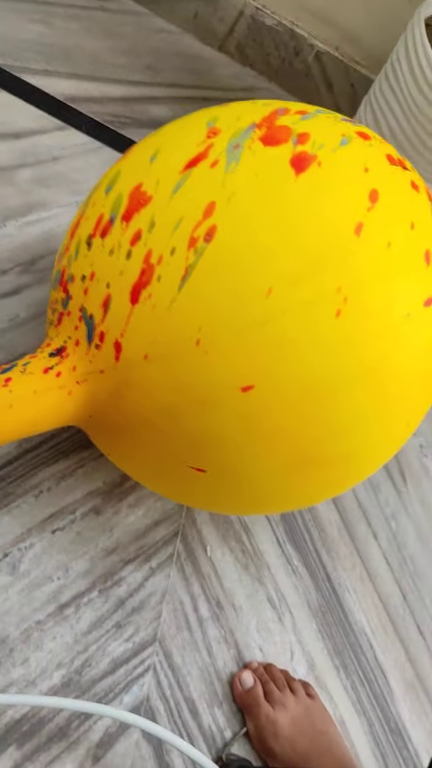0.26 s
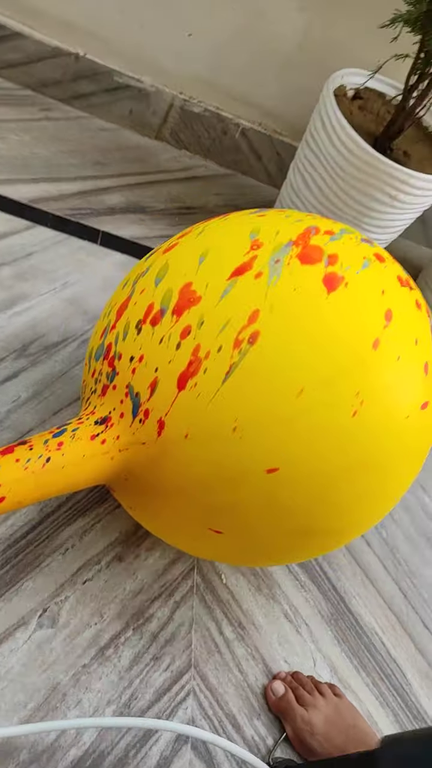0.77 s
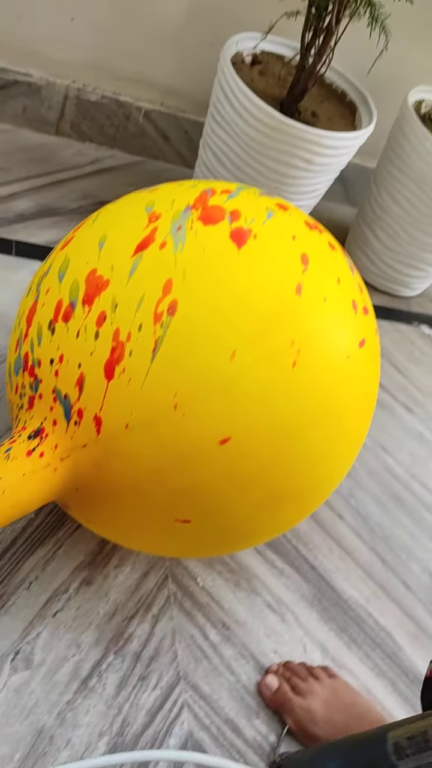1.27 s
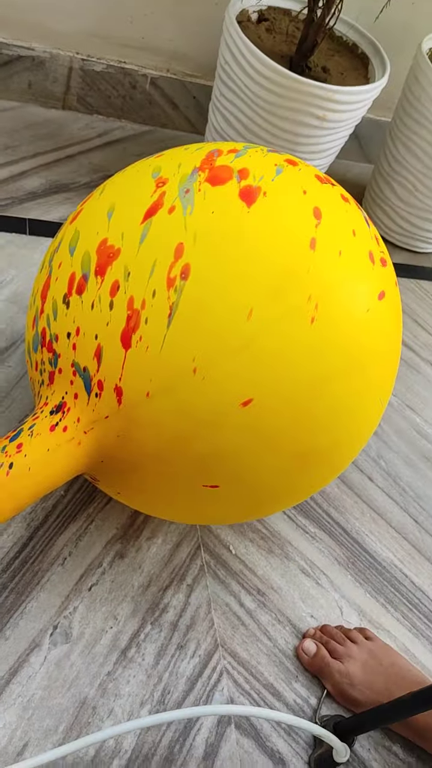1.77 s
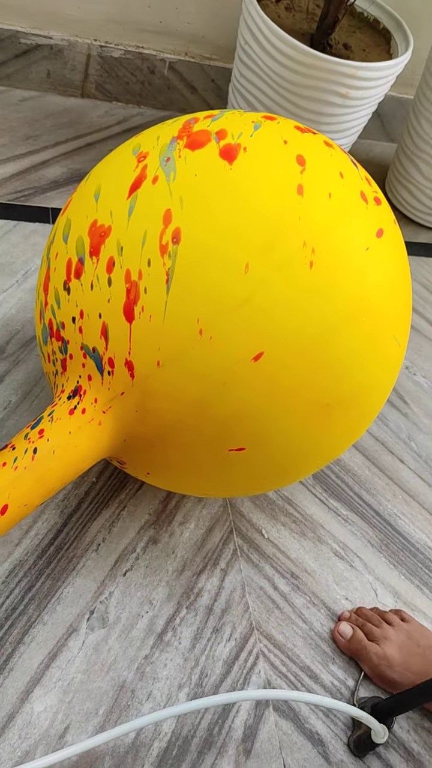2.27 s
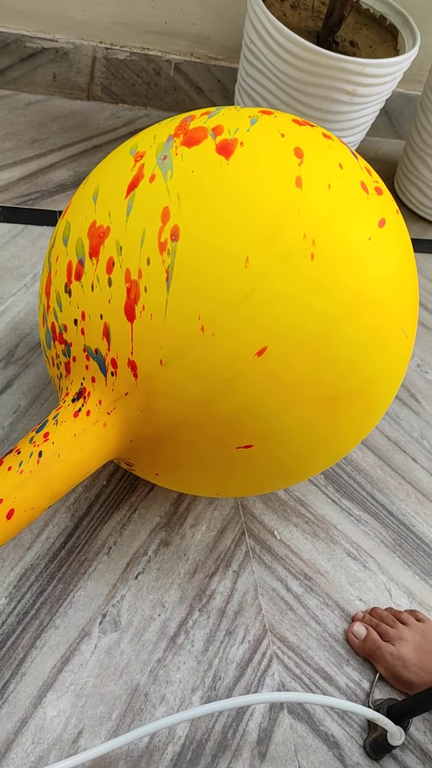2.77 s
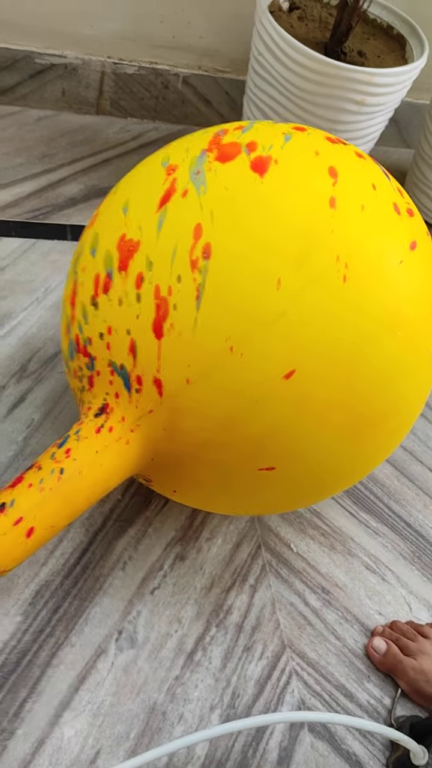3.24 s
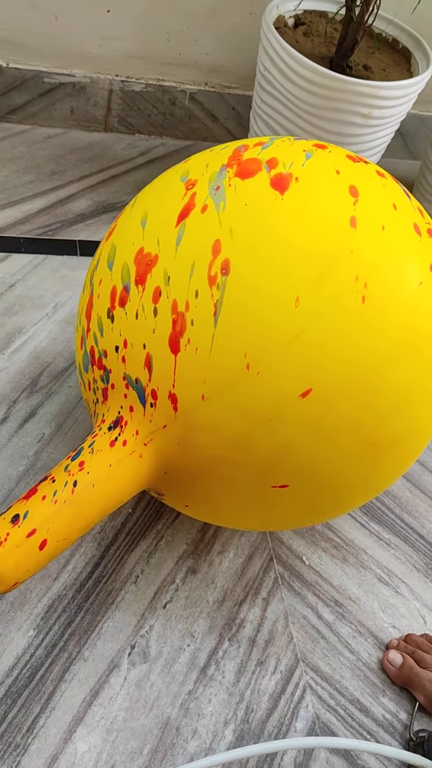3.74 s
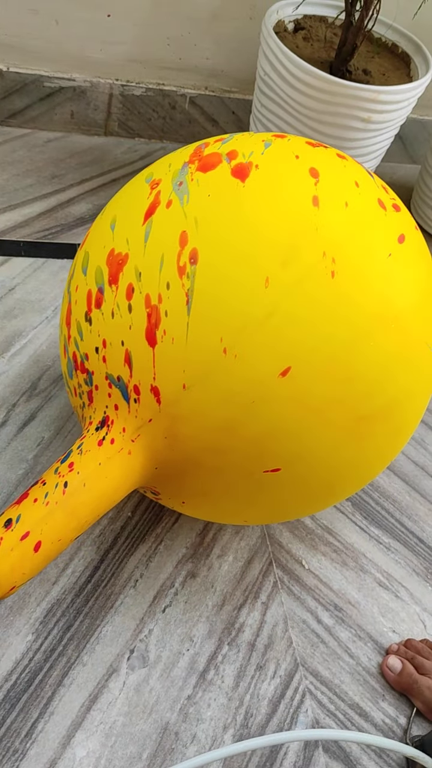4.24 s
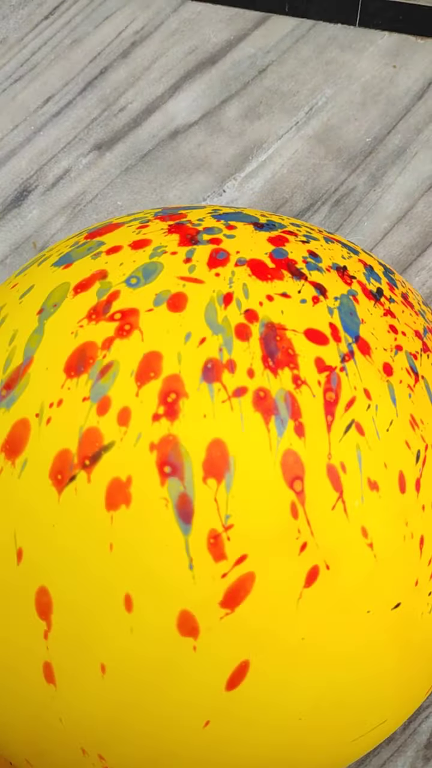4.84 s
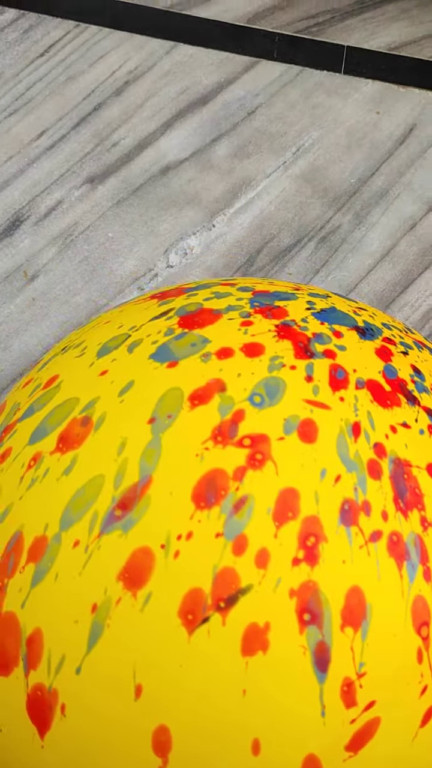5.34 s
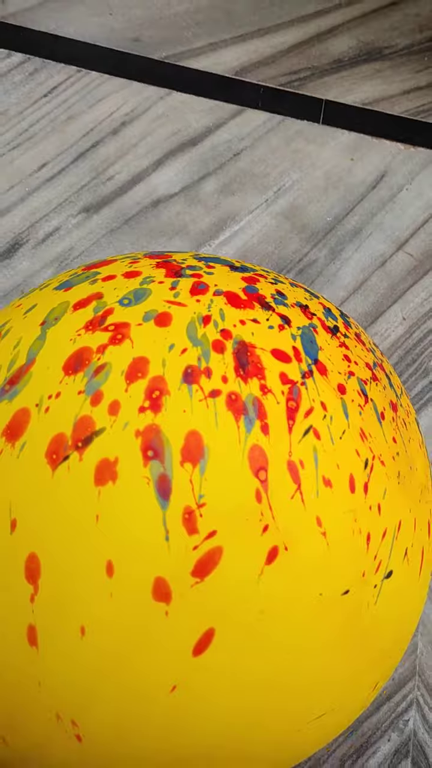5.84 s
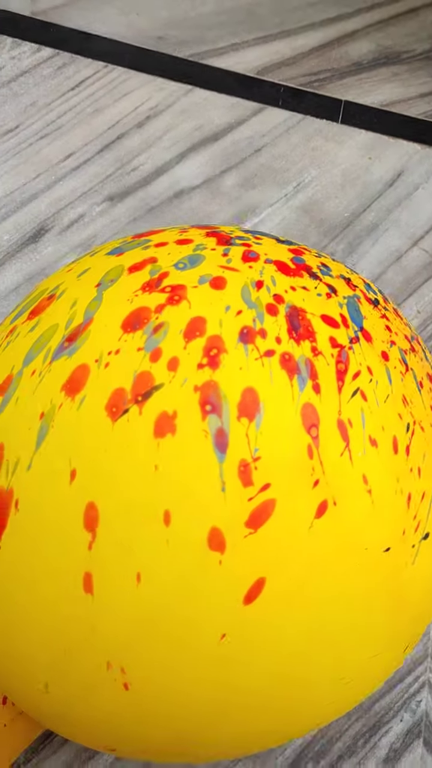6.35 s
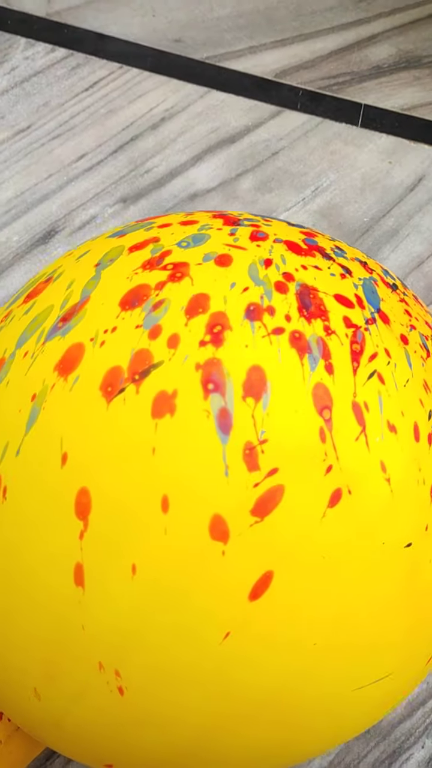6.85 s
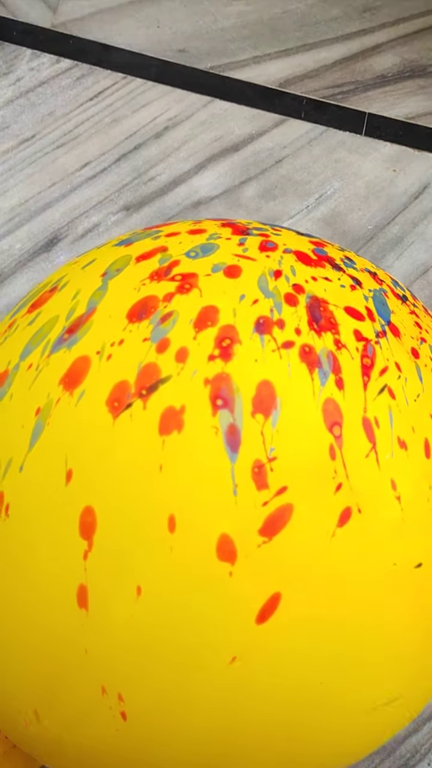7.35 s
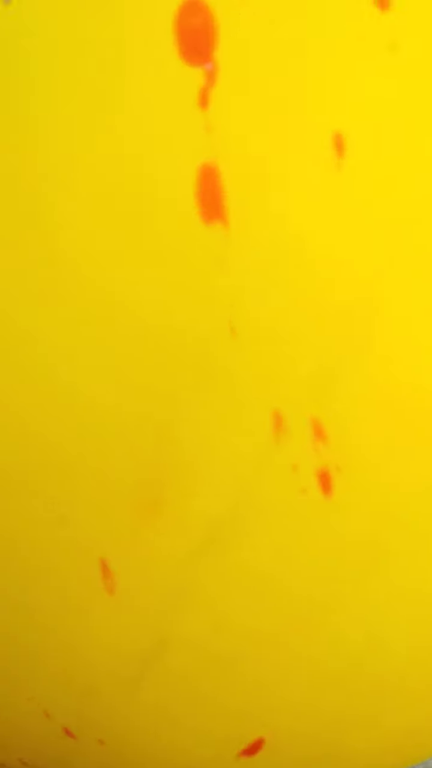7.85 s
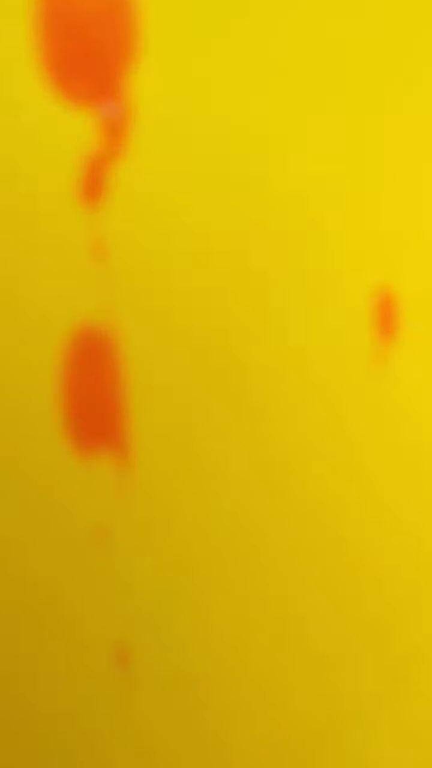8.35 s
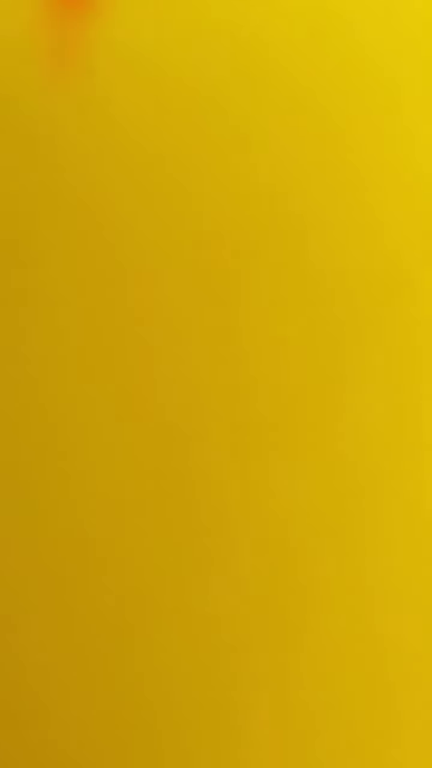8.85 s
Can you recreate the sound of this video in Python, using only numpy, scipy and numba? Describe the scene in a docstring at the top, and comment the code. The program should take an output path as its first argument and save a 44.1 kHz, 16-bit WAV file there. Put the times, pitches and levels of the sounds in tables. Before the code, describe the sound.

In a small, hard tiled room, a hand air pump fills a large balloon. Strong rasping pushes through a resonant hose alternate with softer, sucking pulls that slide upward with brief whistles. Ringing knocks, ticks and dull thuds punctuate the strokes, while low air buffets a close hand-held stereo microphone. At about seven and a half seconds everything cuts out, leaving faint hiss, hum and a late light tap.

```python
"""A hand pump fills a large balloon in a tiled room, heard through the two ports of a hand-held phone.
From the start, pushes (a noise jet through hose resonances) alternate with softer pulls (hiss in a shrinking
air column, with gliding whistles). Many pushes end in a ringing knock; short damped rings tick and thud between.
Low noise buffets the ports. At 4.6 s the jet changes colour as the phone moves over the balloon. Near 7.5 s
all sound drops out, returns for an instant, and leaves hiss, a fuller hum and one last light tap."""
import sys
import numpy as np
from scipy import signal
from scipy.fft import rfft, irfft, next_fast_len
from scipy.io import wavfile
from scipy.ndimage import uniform_filter1d, map_coordinates
from numba import njit

SR = 44100
rng = np.random.default_rng(int(sys.argv[2]) if len(sys.argv) > 2 else 0)


def store_pcm(level_fs):
    """Save levels as 16-bit WAV."""
    pcm = np.round(np.clip(level_fs, -1, 1) * 32767).astype(np.int16)
    wavfile.write(sys.argv[1], SR, np.atleast_2d(pcm).T)


N = 401751
SIZE = next_fast_len(N)  # FFT length in samples

# Source levels are set ahead of flutter and room.
# Pushes of the piston: start_s, ease_off_s, full_hiss_db, fade_s
PUSH_STROKES = [(-.3, -0.061, -30, 0.06), (0.328, 0.545, -31.5, 0.07), (0.992, 1.251, -30.5, 0.047),
                (1.725, 1.941, -29.5, 0.051), (2.316, 2.537, -27.5, 0.047), (2.89, 3.1, -27.5, 0.059),
                (3.49, 3.665, -27.5, 0.077), (4.107, 4.358, -28.5, 0.094), (4.831, 4.956, -26.5, 0.071),
                (5.408, 5.565, -26, 0.067), (6.039, 6.296, -27, 0.052), (6.699, 6.923, -27, 0.051),
                (7.33, 7.69, -27.5, 0.051)]
PUSH_GAP_DB, PUSH_RISE_S = 29, 0.053  # shortfall at start_s, and the time constant that closes it
# Colour of the jet: freq_hz, slope points as gain_db
JET_COLOUR = [(240, -14.5), (400, -11), (636, -10), (738, -13), (883, -1.5), (1510, -9.5), (2590, -7),
              (4400, -4.5), (6430, -1.5), (14200, -23.5)]
# Standing waves of the hose: freq_hz, width_hz, beside_balloon_db, above_balloon_db
HOSE_MODES = [(964, 97, 9, -4.5), (1120, 85, 6.5, 4), (1384, 55, 8, 9), (1645, 94, 11, 12),
              (1906, 117, 10.5, 12.5), (2374, 89, 10.5, 5.5), (2637, 65, 11, 9.5), (2845, 74, 3.5, 5.5),
              (2934, 74, 9, 3.5), (3140, 80, 5.5, 7.5), (3280, 47, 8.5, 2), (3560, 117, 10, 5.5),
              (3760, 69, 4.5, -14), (3973, 97, 6, 7), (4246, 120, 3.5, 1.5), (5200, 35, -9.5, 1),
              (5850, 20, -8, 2)]
# Brighter, leaner jet beside the balloon: freq_hz, gain_db
BESIDE_COLOUR = [(900, -3.5), (4000, 2.5)]
ABOVE_S = 4.6  # the phone is moved over the balloon
HOSE_SWAY, HOSE_SWAY_HZ = 0.007, 4  # typical pitch drift as a share, new drifts per second

# Pulls of the piston: start_s, end_s, peak_hiss_db
PULL_STROKES = [(0.026, 0.308, -37), (0.675, 0.949, -35.5), (1.312, 1.662, -39), (1.978, 2.279, -35.5),
                (2.561, 2.852, -36), (3.171, 3.453, -38), (3.791, 4.046, -37), (4.523, 4.758, -42.5),
                (5.079, 5.351, -41), (5.675, 5.991, -35.5), (6.365, 6.664, -37.5), (6.971, 7.286, -42.5)]
PULL_LATE, PULL_PEAKED = 1.3, 1.05  # exponents: hand fastest after mid-stroke, hiss against its speed
# Colour of the drawn air: freq_hz, gain_db
INTAKE_COLOUR = [(240, -10), (400, -7.5), (800, -6.5), (1280, -6), (2370, -2.5), (2750, -1), (3340, -3),
                 (5070, -9.5), (7140, -2), (10900, -12.5), (14200, -23.5)]
COLUMN_START_HZ, COLUMN_END_HZ = 253.9, 1283.6  # nominal mode spacing, before and after a pull
COLUMN_ECHO = 0.93  # share returned per round, ahead of the treble and bass loss
# Modes of the shrinking column that sing out: start_s, length_s, from_hz, to_hz, peak_db
WHISTLE_GLIDES = [(0.143, 0.073, 2730, 4100, -38), (0.174, 0.02, 2005, 2260, -29.5),
                  (.755, 0.045, 1840, 2060, -40), (0.865, 0.027, 2100, 2580, -35),
                  (1.409, 0.024, 2920, 3200, -39), (1.42, .03, 1880, 2060, -41),
                  (1.435, 0.047, 1460, 1750, -40.5), (1.572, 0.019, 1980, 2150, -35),
                  (1.585, 0.023, 2400, 2610, -42), (2.159, 0.029, 2100, 2530, -36.5),
                  (2.197, 0.024, 1910, 2450, -39), (2.767, 0.068, 1384, 2520, -42),
                  (3.266, 0.06, 1460, 1950, -42.5), (3.378, 0.039, 2030, 2670, -43),
                  (3.917, 0.048, 2250, 2840, -37), (3.965, 0.1, 930, 1330, -49.5),
                  (3.988, 0.079, 1750, 2300, -48.5), (4.641, 0.059, 1500, 1834, -43),
                  (4.665, 0.052, 2400, 2590, -41), (7.13, 0.097, 760, 1107, -47)]
WHISTLE_BREATHY_DB = 7  # typical unsteadiness

# Piston hits its stop: start_s, low_modes_db, bright_modes_db (clack too), pitch_factor
STOP_KNOCKS = [(0.601, -16, -29, 0.77), (1.254, -11.5, -14.5, 0.76), (3.109, -17, -18, 0.76),
               (3.697, -17, -20, 0.97), (4.406, -15, -13.5, 0.99), (5.012, -23, -23.5, 0.91),
               (5.601, -17.5, -20, 0.94), (7.694, -19.5, -17, 0.89)]
# Modes of the barrel, ahead of each knock's factor and levels: freq_hz, level_db, t60_s
BARREL_MODES = [(196, -15, 0.059), (388, -10, 0.051), (504, -2, 0.026), (1025, -13.5, 0.015),
                (1283, -14.5, 0.063), (1558, -1.5, 0.017), (2153, -0.5, 0.0097), (2630, -6, .03)]
# Short soft tones as a valve or the hose flips: start_s, level_db, pitch_hz
FLIP_PIPS = [(0.308, -36.5, 486), (0.966, -28, 551), (1.701, -30, 530), (2.897, -26.5, 544),
             (3.471, -27, 525), (6.539, -26, 863), (6.698, -28, 530), (7.336, -40, 417)]
# Duller thuds as the pressure opens the neck: start_s, level_db, pitch_hz
NECK_THUDS = [(0.44, -29.5, 259), (1.815, -25, 270), (2.417, -27.5, 254), (2.598, -41, 395),
              (2.99, -30, 243), (3.566, -21, 261), (4.726, -38, 272), (4.797, -30.5, 285),
              (5.406, -31, 293), (5.456, -30, 260), (5.808, -36, 258), (5.828, -38, 300),
              (6.158, -22.5, 252), (6.509, -36, 285), (6.544, -32.5, 297), (6.809, -34, 246),
              (7.411, -40, 258)]
# Rod rattles on or just after a pull: start_s, level_db, pitch_hz
ROD_TICKS = [(1.495, -17, 1870), (2.12, -29, 890), (2.145, -33, 1420), (2.216, -28, 820), (2.302, -22, 815),
             (2.742, -19.5, 1600), (3.345, -25, 1440), (4.804, -37, 870), (4.838, -30.5, 895),
             (5.26, -31.5, 860), (5.405, -29.5, 970), (6.003, -32, 620), (6.54, -19.5, 1600),
             (7.298, -37, 480), (7.321, -28, 450)]
TAP_S, TAP_DB = 9.0585, -29.5  # last light tap on something hard nearby
# Modes of the tapped object, relative to the tap level: freq_hz, level_db, t60_s
TAP_MODES = [(380, -4.5, 0.091), (666, 2, 0.037), (1050, -5, 0.058), (1880, -1, 0.028), (2680, -5, .02),
             (3710, 0, 0.022), (5400, -23, .03)]

# Strength of the draught on the ports, ahead of its split and scaling: time_s, level_db
DRAUGHT_LEVEL = [(0, -25), (.14, -24), (.25, -44), (.32, -41), (.36, -25), (.61, -36), (1.19, -31.5),
                 (1.45, -46.5), (1.72, -34), (1.97, -39.5), (2.05, -28), (2.18, -38.5), (2.76, -30),
                 (2.87, -26), (2.93, -35.5), (3.14, -35), (3.46, -41), (3.52, -29.5), (3.94, -36),
                 (4.3, -49), (5.6, -45.5), (6.3, -53), (7.53, -50)]
DRAUGHT_EVEN_DB, DRAUGHT_LEAN = -45, 1.14  # leans left above this level, right below; dB per dB
# Colour of the buffets: freq_hz, gain_db
BUFFET_COLOUR = [(12, -66), (20, -25), (54, 3.5), (103, 1), (165, -3), (231, -9.5), (340, -12.5),
                 (478, -24.5), (780, -30), (1320, -120)]
# Single gusts that thump one port: centre_s, level_db, port (0 left, 1 right)
PORT_GUSTS = [(0.109, -14, 0), (0.127, -16, 0), (0.387, -15, 0), (0.442, -12.5, 0), (0.515, -18.5, 0),
              (0.631, -19, 1), (0.798, -20.5, 0), (1.714, -26, 0), (2.015, -12.5, 0), (2.302, -14, 0),
              (2.695, -9, 0), (2.795, -17.5, 0), (2.841, -13.5, 0), (2.897, -12.5, 0), (3.007, -11, 0),
              (3.276, -15, 0), (3.555, -11, 0), (3.885, -17.5, 0), (4.915, -25, 1)]

# Colour of the quiet room's hiss: freq_hz, gain_db
ROOM_COLOUR = [(12, -59), (20, -22.5), (54, 1.5), (77, -8.5), (107, -22), (157, -17.5), (207, -20.5),
               (411, -24.5), (526, -24), (740, -28), (1270, -31), (2600, -32), (5580, -29.5),
               (14200, -54.5)]
ROOM_HISS_DB = -47  # rms ahead of wander and balance
# Hum and faint whines at their fuller level, ahead of wander and balance: freq_hz, peak_db
HUM_TONES = [(49, -49.5), (102, -57), (205, -65), (545, -72), (1087, -74), (1631, -72.5), (2169, -70)]

ROOM_T60_S, ROOM_MOVES = 0.19, 44  # reverb time, crossfades between tails over the scene
ALIKE_HZ = 724  # below this the tails at both ports become alike
# Difference in colour between the ports: freq_hz, left_minus_right_db
PORT_COLOUR = [(500, -0.5), (1000, -1), (2000, 2.5), (4000, 1.5), (6500, -4.5), (7500, -0.5), (9000, 5.5),
               (14000, -1.5)]
SILENT_S, RETURN_S, LAST_S = 7.538, 7.678, 7.712  # dropout, return, end of pumping
TOP_HZ = 14270  # upper edge of what is heard


def hose_jet(modes_column, lean):
    """Turbulent jet noise lifted at the hose's standing waves, rms 1."""
    freq = np.fft.rfftfreq(SIZE, 1 / SR)
    lift = 0.54  # power that passes between the modes
    for row in HOSE_MODES:
        hz, width_hz = row[:2]
        lift = lift + undb(row[modes_column]) ** 2 / (1 + ((freq - hz) / (width_hz / 2)) ** 2)
    return noise(gain_of(JET_COLOUR) * lean * np.sqrt(lift))[0]


def pushes():
    """Each push drives the hose jet; flexing of the hose bends the pitch of its modes."""
    t = np.arange(N) / SR
    drift = np.arange(N) + np.cumsum(HOSE_SWAY * walk(HOSE_SWAY_HZ))
    beside = map_coordinates(hose_jet(2, gain_of(BESIDE_COLOUR)), [drift], mode="mirror")
    above = map_coordinates(hose_jet(3, 1), [drift], mode="mirror")
    pressure = np.zeros(N)
    for start, ease, db, fade in PUSH_STROKES:
        gap_db = PUSH_GAP_DB * np.exp(np.minimum((start - t) / PUSH_RISE_S, 2))
        release = np.exp(-(np.maximum(t - ease, 0) / fade) ** 2)
        pressure += undb(db - gap_db) * release * (t > start - 2 * PUSH_RISE_S)
    return pressure * np.where(t < ABOVE_S, beside, above)


def pulls():
    """Intake hiss resonates in the air column above the piston, whose modes glide up as it shrinks."""
    t = np.arange(N) / SR
    draw, travel = np.zeros(N), np.zeros(N)  # travel is 1 with the handle fully out
    for start, end, db in PULL_STROKES:
        way = np.clip((t - start) / (end - start), 0, 1)
        draw += undb(db) * np.abs(np.sin(np.pi * way ** PULL_LATE)) ** PULL_PEAKED
        travel = np.where(t >= start, way, travel)
    long_lag, short_lag = SR / COLUMN_START_HZ, SR / COLUMN_END_HZ
    lag = long_lag + travel * (short_lag - long_lag)
    hiss = level(column(noise(gain_of(INTAKE_COLOUR))[0], lag, COLUMN_ECHO, soft=0.81, leak=0.08), 0)
    return draw * hiss * undb(3.5 * walk(30))


@njit
def column(x, lag, echo, soft, leak):
    """Sound running to and fro in a tube of changing length; each round loses treble and leaks bass."""
    y, low, bass = np.zeros(len(x)), 0., 0.
    for i in range(400, len(x)):
        past = i - lag[i]
        k = int(past)
        returned = y[k] + (past - k) * (y[k + 1] - y[k])  # between two samples
        low += soft * (returned - low)
        bass += leak * (low - bass)
        y[i] = x[i] + echo * (low - bass)
    return y


def seal_flutter():
    """Rapid random gain as the piston's seal flutters, making the air rasp."""
    return undb(2.56 * walk(60))


def whistles():
    """Single column modes sing out as short unsteady tones that glide up around the pulls."""
    out = np.zeros(N)
    for s, length, from_hz, to_hz, db in WHISTLE_GLIDES:
        way = np.linspace(0, 1, int(length * SR))
        phase = 2 * np.pi * np.cumsum(from_hz * (to_hz / from_hz) ** way) / SR
        add(out, s, undb(db) * np.sin(np.pi * way) * np.sin(phase))
    return out * undb(WHISTLE_BREATHY_DB * walk(90))


def knocks():
    """The piston's stop clacks as a noise burst and rings the damped modes of the barrel."""
    out = np.zeros(N)
    for s, low_db, bright_db, pitch in STOP_KNOCKS:
        for hz, mode_db, t60 in BARREL_MODES:
            strike_db = low_db if hz < 800 else bright_db
            add(out, s, undb(mode_db + strike_db) * ring(hz * pitch, t60, 0.0012))
        add(out, s, undb(bright_db + 6.0) * crack(670, 3300, 0.0062))
    return out


def valves_and_rod():
    """Pips and thuds are single damped rings; rod ticks add a dry crack to theirs."""
    out = np.zeros(N)
    for s, db, hz in FLIP_PIPS:
        add(out, s, undb(db) * ring(hz, 0.06, 0.0025))
    for s, db, hz in NECK_THUDS:
        add(out, s, undb(db) * ring(hz, 0.082, 0.0037))
    for s, db, hz in ROD_TICKS:
        rattle = crack(0.28 * hz, 2.2 * hz, 0.0058) + 0.5 * ring(hz, 0.029, 0.0004)
        add(out, s, undb(db) * rattle)
    return out


def last_tap():
    """A light contact cracks and rings the modes of something hard."""
    out = np.zeros(N)
    tap = 2.9 * crack(280, 2800, 0.0056)
    for hz, db, t60 in TAP_MODES:
        tap += undb(db) * ring(hz, t60, 0.0003)
    add(out, TAP_S, undb(TAP_DB) * tap)
    return out


def draught():
    """Moving air buffets each port with unrelated low noise, in lumps, with a few hard gusts."""
    db = curve(*np.transpose(DRAUGHT_LEVEL))
    left = 1 / (1 + undb(-DRAUGHT_LEAN * (db - DRAUGHT_EVEN_DB)) ** 2)  # share of the power
    slow, fast = np.array([walk(20), walk(18)]), np.array([walk(70), walk(70)])
    lumps = undb(np.minimum(7.2 * slow + 8.3 * fast, 7))
    buffets = level(noise(gain_of(BUFFET_COLOUR), channels=2) * lumps, 0)
    out = 2 * undb(db) * np.sqrt([left, 1 - left]) * buffets
    for s, gust_db, port in PORT_GUSTS:
        add(out[int(port)], s - 2000 / SR, undb(gust_db) * gust())
    return out


def gust():
    """A low swell and a shorter, higher one at random pitch and phase, centred in the burst."""
    t = np.arange(-2000, 2000) / SR
    a, b = rng.random(2)
    thump = np.exp(-(t / 0.0067) ** 2) * np.sin(2 * np.pi * (62 * (1 + 1.01 * a) * t + b))
    slap = np.exp(-(t / 0.0032) ** 2) * np.sin(2 * np.pi * (190 * (1 + 0.5 * b) * t + a))
    return thump + 0.58 * slap


def room_tone():
    """Gently wandering hiss over wavering sines; the hum is fuller once the phone is against the balloon."""
    t = np.arange(N) / SR
    hiss = level(noise(gain_of(ROOM_COLOUR), channels=2), ROOM_HISS_DB) * undb(0.4 * walk(2.94))
    hum = np.zeros(N)
    for hz, db in HUM_TONES:
        loudness = undb(db + (3.0 + hz / 450) * walk(13))
        hum += loudness * np.sin(2 * np.pi * hz * t + (1.1 + hz / 600) * walk(14))
    hum *= undb(-11.0 * (t < LAST_S))
    return (hiss + hum) * undb([[1.5], [-1.5]])  # left a little louder


def room(x, wet_db, direct):
    """Direct sound plus a diffuse tail for each port; the tail changes as the phone wanders."""
    t = np.arange(int(.25 * SR)) / SR
    decay = np.exp(-np.log(1000) * t / ROOM_T60_S) * np.clip(t / 0.0012, 0, 1)
    alike = signal.butter(1, ALIKE_HZ, fs=SR, output="sos")
    out, place = np.zeros((2, N)), np.arange(N) * ROOM_MOVES / N
    for k in range(ROOM_MOVES + 1):
        tail = rng.standard_normal((2, len(t))) * decay
        shared = tail.sum(0) / np.sqrt(2)
        tail += signal.sosfilt(alike, shared - tail)
        tail = level(tail, wet_db) / np.sqrt(len(t))
        a, b = max(0, (k - 1) * N // ROOM_MOVES), min(N, (k + 1) * N // ROOM_MOVES)
        part = x[a:b] * np.cos(np.pi / 2 * (place[a:b] - k))  # crossfade to the neighbours
        wet = signal.fftconvolve(part[None], tail, axes=1)
        out[:, a:a + wet.shape[1]] += wet[:, :N - a]
    return out + direct * np.array([x, np.roll(x, 8)])  # right port 8 samples later


def undb(db):
    """Decibels to amplitude."""
    return 10 ** (np.asarray(db) / 20)


def level(x, db):
    """Scale to an rms level in dB, over all channels together."""
    return x * undb(db) / np.sqrt(np.mean(x ** 2))


def curve(s, v):
    """Straight lines between timed values."""
    return np.interp(np.arange(N) / SR, s, v)


def gain_of(points):
    """Gain at every FFT bin from freq_hz, gain_db points."""
    hz, db = np.transpose(points)
    return undb(np.interp(np.log(np.fft.rfftfreq(SIZE, 1 / SR) + 1), np.log(hz), db))


def noise(gain, channels=1):
    """Noise of a given colour, rms 1."""
    spectrum = rfft(rng.standard_normal((channels, SIZE))) * gain
    return level(irfft(spectrum, SIZE)[:, :N], 0)


def walk(rate):
    """Random levels held 1 / rate s and slewed twice; spread near 1."""
    k = int(SR / rate)
    steps = np.repeat(rng.standard_normal(N // k + 1), k)
    return 0.72 * uniform_filter1d(uniform_filter1d(steps, k), k)[:N]


def add(out, s, x):
    """Mix a sound in at a time in seconds."""
    i = int(s * SR)
    out[i:i + len(x)] += x[:N - i]


def ring(hz, t60, rise_s):
    """A damped mode with a soft start, envelope peak 1."""
    t = np.arange(int(.15 * SR)) / SR
    shape = np.exp(-np.log(1000) * t / t60) * (1 - np.exp(-(t / rise_s) ** 2))
    return np.sin(2 * np.pi * hz * t) * shape / shape.max()


def crack(lo_hz, hi_hz, decay_s):
    """A dry, decaying burst of band noise."""
    t = np.arange(int(.15 * SR)) / SR
    band = signal.butter(2, (lo_hz, hi_hz), "bandpass", fs=SR, output="sos")
    return signal.sosfilt(band, rng.standard_normal(len(t)) * np.exp(-t / decay_s))


def scene():
    """Place the pump in the room, cut it off with its echo, and lay in draught and room tone."""
    t = np.arange(N) / SR
    pumping = np.clip((LAST_S - t) / 0.00059, 0, 1)
    later = t > LAST_S + 1  # lets the last tap through
    rasp = seal_flutter()
    hiss = room(rasp * pushes(), wet_db=1.5, direct=0.56) + room(rasp * pulls(), wet_db=-3.0, direct=0.81)
    body = knocks() + valves_and_rod() + last_tap() + whistles()
    pump = room(body, wet_db=-5.0, direct=0.97)  # nearer than the jet
    return (hiss + draught()) * pumping + pump * (pumping + later) + room_tone()


def record(dry):
    """Port colours, the dropout, and the cut at the top."""
    tilt = gain_of(PORT_COLOUR) ** np.array([[.5], [-.5]])
    t = np.arange(N) / SR
    fall, rise = np.exp((SILENT_S - t) / 0.0025), (t - RETURN_S) / 0.0034
    on = np.clip(np.maximum(fall, rise), 0, 1)
    heard = irfft(rfft(dry, SIZE) * tilt, SIZE)[:, :N] * on
    return signal.sosfilt(signal.ellip(10, .2, 80, TOP_HZ, fs=SR, output="sos"), heard)


dry = scene()
out = record(dry)
store_pcm(out)
```